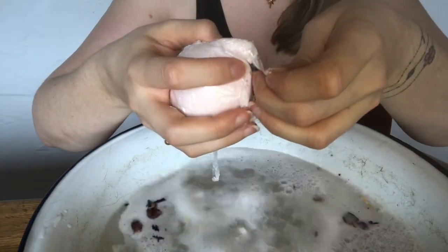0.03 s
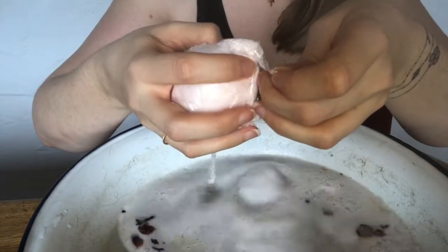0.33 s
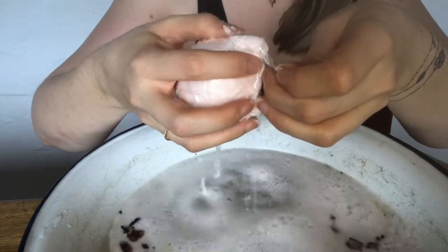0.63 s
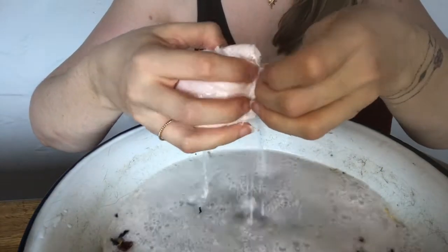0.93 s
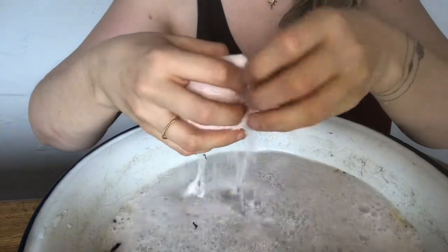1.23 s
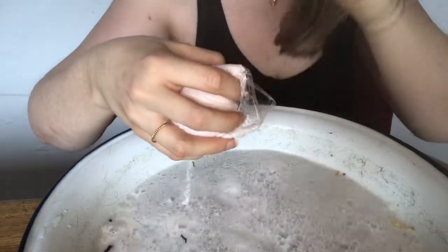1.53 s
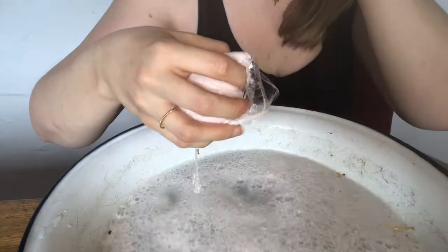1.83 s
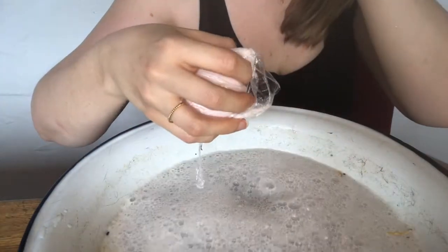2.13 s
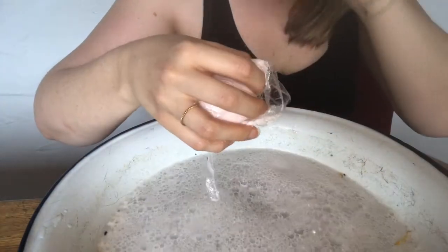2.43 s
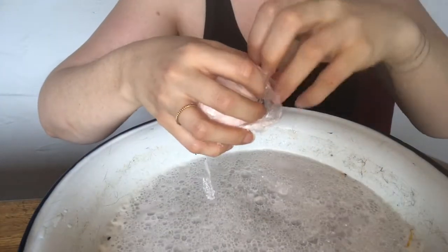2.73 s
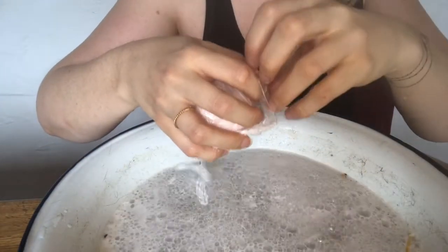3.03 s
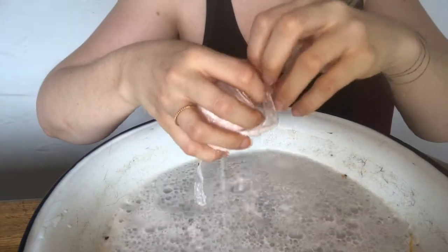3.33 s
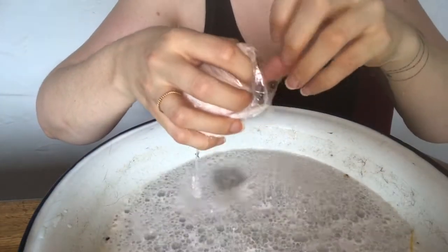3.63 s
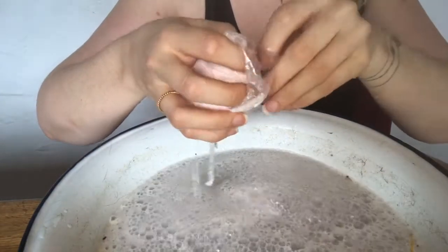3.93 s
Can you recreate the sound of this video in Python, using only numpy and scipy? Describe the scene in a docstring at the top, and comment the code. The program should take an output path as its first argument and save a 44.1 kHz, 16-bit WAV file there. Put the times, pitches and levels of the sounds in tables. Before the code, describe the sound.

A wet bath bomb fizzes steadily while water drips into a foamy basin.

```python
"""A wet bath bomb fizzes over an enamel basin of foamy water in a small room.
Countless tiny bubbles burst, each ringing briefly, and merge into a steady hiss. Drops fall from the
hand and plop dully into the foam; the plastic wrap buckles and ticks now and then. Drops and ticks
excite the basin and the room. Under it all: a quiet rumble and a faint low tone. Close and mono."""
import sys
import numpy as np
from scipy import signal
from scipy.fft import rfft, irfft
from scipy.io import wavfile
from scipy.ndimage import uniform_filter1d

SR = 44100
rng = np.random.default_rng(int(sys.argv[2]) if len(sys.argv) > 2 else 0)


def unload_audio(sound):
    """Save the sound as a 16-bit wav file, at the path given as the first command line argument."""
    columns = np.transpose(np.atleast_2d(sound))
    # keep every value between -1 and 1, then stretch to whole-number steps
    steps = np.round(np.clip(columns, -1, 1) * 32767)
    wavfile.write(sys.argv[1], SR, steps.astype(np.int16))


N = 176400
T = np.arange(N) / SR
BIN_HZ = np.arange(N // 2 + 1) * SR / N


def fizz():
    """Near bursts over the smooth hiss of the whole foam; three bands swell separately."""
    # fizz colour as heard, with the recorder's drop of about 3 dB above 8 kHz:
    # (frequency [Hz], relative level [dB])
    heard_colour = [(250, -18.5), (590, -13.5), (680, -11), (780, -12.5), (940, -6), (1100, -6.5),
                    (1230, -8), (1430, -3.5), (1600, -2.5), (2000, -2.5), (2500, 1.5), (3600, 4),
                    (5000, 2.5), (6500, -1), (8000, -1), (8250, -4.5), (11000, -5.5), (13500, -7.5),
                    (15800, -10.5)]
    # band envelopes before trim: (time [s], level [dB])
    low_level = [(0, -62.5), (0.3, -60.5), (0.65, -58.5), (0.95, -56.8), (1.2, -56.5), (1.5, -58.5),
                 (2, -57.5), (2.8, -57), (3.3, -59), (4, -58)]
    mid_level = [(0, -50.5), (0.3, -52.3), (0.7, -51), (1.05, -50), (1.22, -48.5), (1.5, -49.5),
                 (2.1, -49.5), (2.8, -50.5), (3.4, -50.6), (4, -51.5)]
    treble_level = [(0, -52), (0.35, -50.5), (0.8, -50), (1.2, -50.5), (1.6, -51), (2.1, -51), (2.7, -51),
                    (3.2, -51.5), (3.6, -52.5), (4, -51.9)]
    low_edge_hz, treble_edge_hz = 2266, 6170
    hiss = from_db(1.5) * rng.standard_normal(N)
    coloured = rfft(colour(bubble_bursts() + hiss, heard_colour))
    low = 1 / (1 + (BIN_HZ / low_edge_hz) ** 6)
    below_treble = 1 / (1 + (BIN_HZ / treble_edge_hz) ** 6)
    mid, treble = below_treble - low, 1 - below_treble
    bands = ((low, low_level, 0.5), (mid, mid_level, -1.5), (treble, treble_level, -0.5))
    return sum(rms_one(irfft(coloured * band, N)) * level(envelope) * from_db(trim_db)
               for band, envelope, trim_db in bands)


def bubble_bursts():
    """Bubbles burst at random, each ringing a few cycles at its pitch; the sum is whitened."""
    rate_per_s, spread_db, t60_cycles = 13000, 2, 11.4
    small_bias = 1.6  # above 1: more small, high bubbles
    pitches_hz = np.geomspace(700, 16000, 32)
    strength = from_db(spread_db * np.minimum(rng.exponential(1, N), 5))
    polarity = rng.choice([-1, 1], N)
    impulses = strength * polarity * (rng.random(N) < rate_per_s / SR)
    pitch_index = (len(pitches_hz) * rng.random(N) ** (1 / small_bias)).astype(int)
    cloud = rfft(sum(ring(impulses * (pitch_index == k), hz, t60_cycles / hz)
                     for k, hz in enumerate(pitches_hz)))
    power = uniform_filter1d(np.abs(cloud) ** 2, size=2000)
    return rms_one(irfft(cloud / np.sqrt(power + 1e-12), N))


def plops(rows):
    """Each drop gives a soft push and a few foam-damped cycles that swell, sink in pitch and die."""
    fall_octaves, sharpness, push_db = 0.12, 2.1, -38
    out, t = np.zeros(N + SR), T[:SR // 20]
    for time_s, peak_db, peak_hz, swell_s in rows:
        age = t / swell_s  # 1 at the peak
        pitch_hz = peak_hz * 2 ** (fall_octaves * (1 - age) / (1 + age / 10))
        cycles = np.sin(2 * np.pi * np.cumsum(pitch_hz) / SR)
        push = from_db(push_db) * (1 - age)
        envelope = from_db(peak_db) * (age * np.exp(1 - age)) ** sharpness
        start = int(time_s * SR)
        out[start:start + len(t)] += envelope * (cycles + push)
    return butter(out[:N], hz=109, kind="high")


def drops():
    """Distinct drops land in the foam, mostly in clusters."""
    # landings: (time [s], peak level [dB], pitch at peak [Hz], swell [s])
    landings = [(.8520, -55, 607, .001), (.8897, -37.5, 1910, 0.00071), (.9177, -38, 1080, 0.0018),
                (.9223, -54, 484, .002), (.9230, -47.5, 680, 0.0046), (.9286, -37, 930, 0.0015),
                (.9318, -59, 427, 0.0046), (.9355, -49, 850, 0.0014), (.9432, -52.5, 346, 0.0011),
                (.9534, -50, 820, 0.0057), (.9618, -56.5, 410, 0.004), (1.0262, -45, 734, 0.0013),
                (1.0395, -53, 860, 0.0026), (1.1166, -50, 936, .0045), (1.1224, -56.5, 343, 0.0047),
                (1.1272, -34.5, 1970, 0.00063), (1.1278, -38, 940, 0.002), (1.1453, -41, 890, .001),
                (1.1478, -50.5, 487, 0.0014), (1.1615, -44, 1680, 0.0013), (1.2303, -40.5, 864, 0.0018),
                (1.2626, -47, 1050, .0014), (1.3362, -45, 1173, .001), (1.3490, -50, 453, .0008),
                (2.6520, -51.5, 940, 0.0024), (2.6745, -53, 637, 0.00095), (2.9100, -48, 982, 0.0021),
                (2.9371, -38, 1120, .002), (2.9696, -40.5, 930, 0.0013), (2.9700, -48, 540, 0.0011),
                (2.9742, -50.5, 345, 0.0023), (2.9885, -55, 334, 0.0045), (3.0150, -61, 480, .0035),
                (3.4052, -35.5, 1050, 0.00091), (3.4100, -47, 655, 0.0023), (3.4135, -52.5, 377, 0.0033)]
    return plops(landings)


def dribble():
    """Faint droplets fall from the hand at random."""
    rate_per_s, swell_s = 22, 0.0014
    peak_db, spread_db = -59, 1
    pitch_hz, spread_octaves = 1200, 0.3
    times_s = T[rng.random(N) < rate_per_s / SR]
    scatter = rng.standard_normal((len(times_s), 2))
    peaks_db = peak_db + spread_db * scatter[:, 0]
    pitches_hz = pitch_hz * 2 ** (spread_octaves * scatter[:, 1])
    return plops([(s, db, hz, swell_s) for s, db, hz in zip(times_s, peaks_db, pitches_hz)])


def wrap_ticks():
    """The plastic film buckles with a sharp snap and a very short flutter."""
    # buckles: (time [s], impulse level [dB])
    buckles = [(0.89, -30), (.9630, -34), (1.063, -40), (1.1259, -16), (1.127, -23), (2.9095, -24),
               (3.4052, -36)]
    flutter_db, flutter_decay_s = -19.5, 0.0007
    clicks, t = np.zeros(N), T[:SR // 50]
    for time_s, db in buckles:
        clicks[int(time_s * SR)] = from_db(db)
    snap = clicks + 0.5 * ring(clicks, hz=3200, t60_s=0.0012)
    tail = from_db(flutter_db) * rng.standard_normal(len(t)) * np.exp(-t / flutter_decay_s)
    flutter = signal.fftconvolve(clicks, tail)[:N]
    return butter(snap + flutter, hz=1900, kind="high")


def basin(x):
    """The hollow of the basin rings."""
    # modes: (frequency [Hz], gain [dB], T60 [s])
    modes = [(195, 15.5, 0.18), (360, 5.5, 0.078), (463, 11, 0.084), (650, 3.5, 0.2), (755, 1, 0.26),
             (930, -6.5, 0.13)]
    return sum(from_db(db) * ring(x, hz, t60_s) for hz, db, t60_s in modes)


def room(x):
    """The small room answers with a short, dull tail."""
    t60_s, gap_s, gain_db = 0.41, 0.0013, -7.5
    t = T[:SR // 2]
    tail = rng.standard_normal(len(t)) * from_db(-60 * t / t60_s) * (t > gap_s)
    reverb = signal.fftconvolve(x, tail / np.linalg.norm(tail))[:N]
    return from_db(gain_db) * butter(reverb, hz=1780, kind="low")


def low_tone():
    """A faint low tone swells twice."""
    # swells: (centre time [s], peak level [dB], half width [s])
    swells = [(.615, -65.5, 0.056), (2.413, -65.5, 0.053)]
    pitch_hz = 296
    envelope = sum(from_db(db) * np.exp(-((T - s) / half_s) ** 2) for s, db, half_s in swells)
    return envelope * np.sin(2 * np.pi * pitch_hz * T)


def room_rumble():
    """Steady low background noise."""
    # rumble spectrum: (frequency [Hz], relative level [dB])
    spectrum = [(20, -40), (35, -21), (52, -5), (64, -4), (74, 6), (86, -3), (120, 2), (145, -0.5),
                (200, -0.5), (265, 0.5), (297, 1.5), (325, -1), (365, -2), (520, -4.5), (1000, -3),
                (3000, -19.5)]
    return from_db(-69.5) * rms_one(colour(rng.standard_normal(N), spectrum))


def from_db(db):
    """Decibels to gain."""
    return 10 ** (np.asarray(db) / 20)


def rms_one(x):
    """Scale to unit power."""
    return x / np.sqrt(np.mean(x ** 2) + 1e-20)


def level(rows):
    """Gain curve from (time [s], level [dB])."""
    return from_db(np.interp(T, *np.transpose(rows)))


def butter(x, hz, kind, order=2):
    """Low-pass or high-pass."""
    return signal.sosfilt(signal.butter(order, hz, kind, fs=SR, output="sos"), x)


def colour(x, points):
    """Shape the spectrum by (frequency [Hz], gain [dB])."""
    hz, db = np.transpose(points)
    gain_db = np.interp(np.log(np.maximum(BIN_HZ, 1)), np.log(hz), db)
    return irfft(rfft(x) * from_db(gain_db), N)


def ring(x, hz, t60_s):
    """Two-pole resonance, unit peak gain."""
    radius = from_db(-60 / (t60_s * SR))
    zeros = np.array([1, 0, -1]) * (1 - radius ** 2) / 2
    poles = [1, -2 * radius * np.cos(2 * np.pi * hz / SR), radius ** 2]
    return signal.lfilter(zeros, poles, x + 1e-18)


def scene():
    """Fizz, drops and wrap over the quiet room, the same in both channels."""
    rumble = room_rumble()
    foam = fizz()
    transients = drops() + wrap_ticks() + dribble()
    mono = foam + transients + basin(transients) + room(transients) + rumble + low_tone()
    return np.tile(mono, (2, 1))


def record(dry):
    """The microphone loses the deepest bass; the top is cut steeply."""
    top_hz = 15830
    bass_cut = butter(dry, hz=40, kind="high", order=4)
    low_pass = signal.firwin(401, top_hz, fs=SR)
    return signal.fftconvolve(bass_cut, low_pass[None], mode="same", axes=1)


dry = scene()
out = record(dry)
unload_audio(out)
```